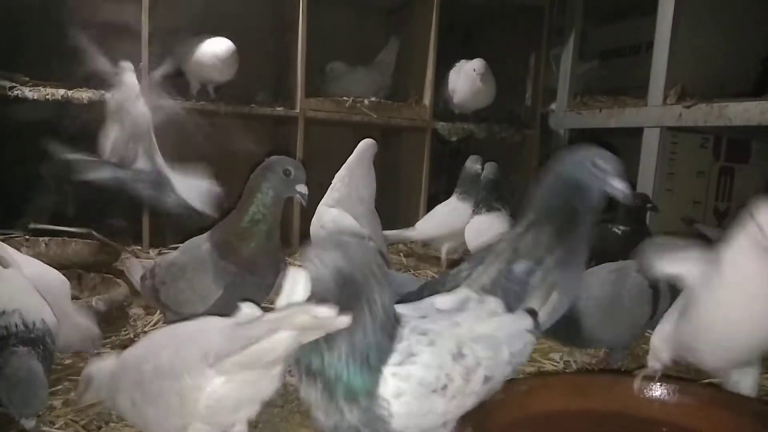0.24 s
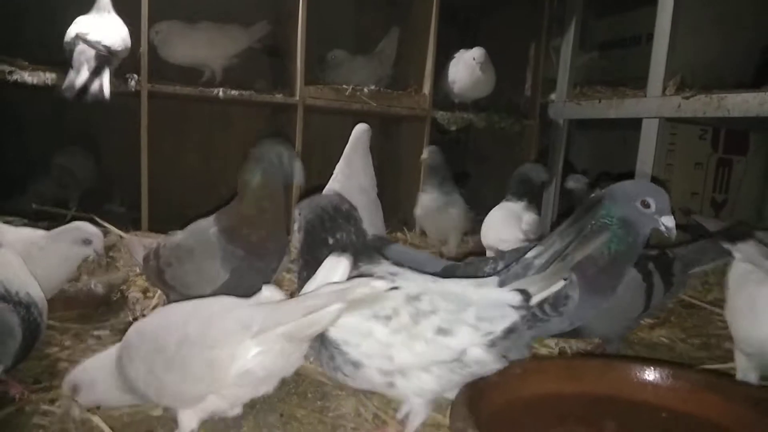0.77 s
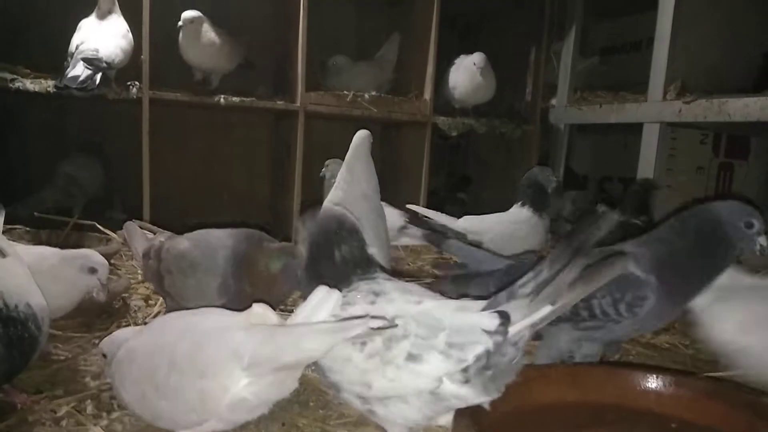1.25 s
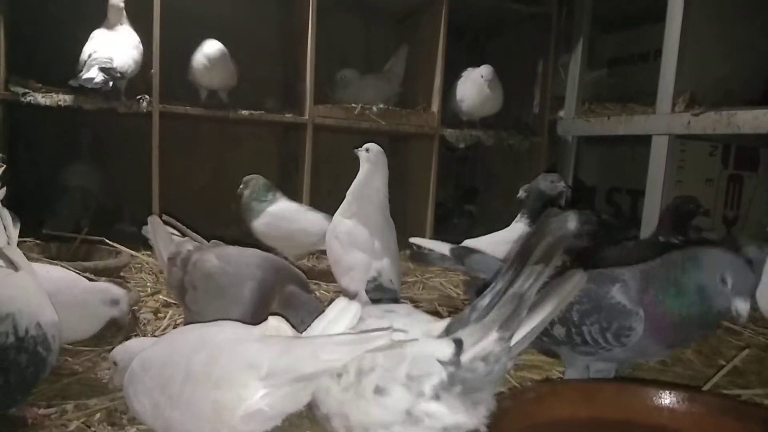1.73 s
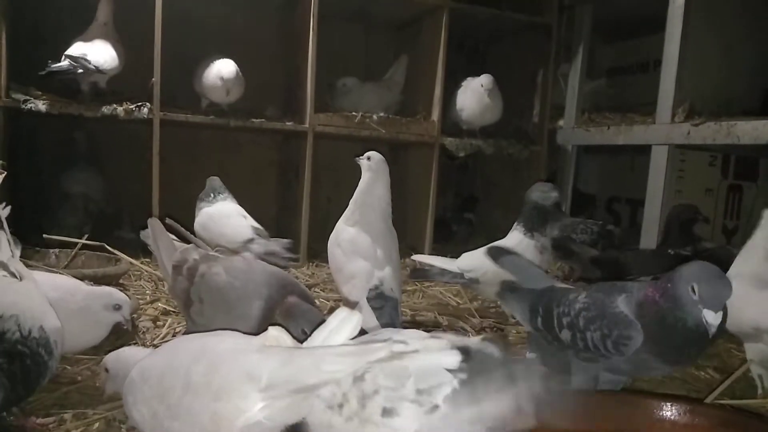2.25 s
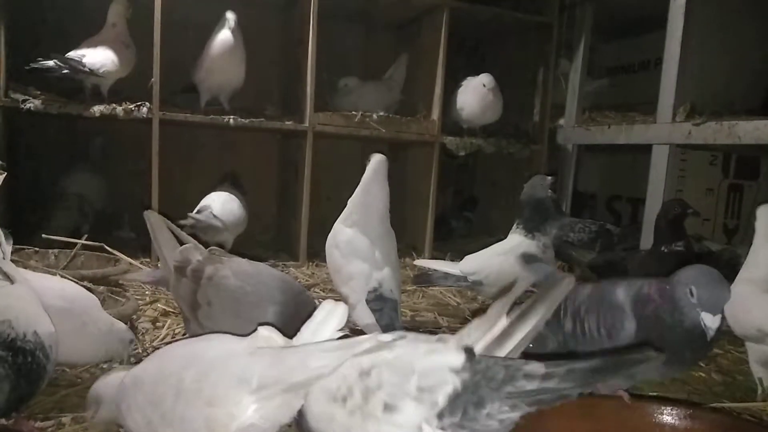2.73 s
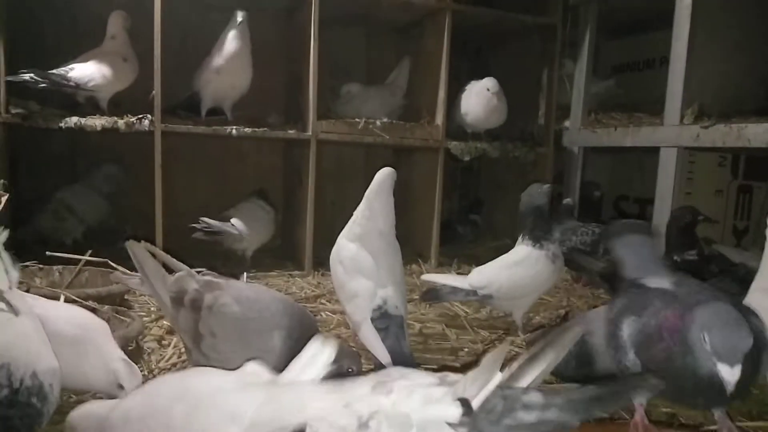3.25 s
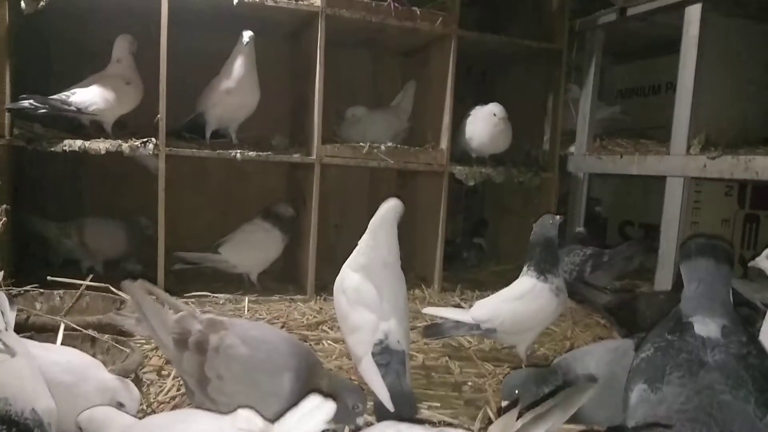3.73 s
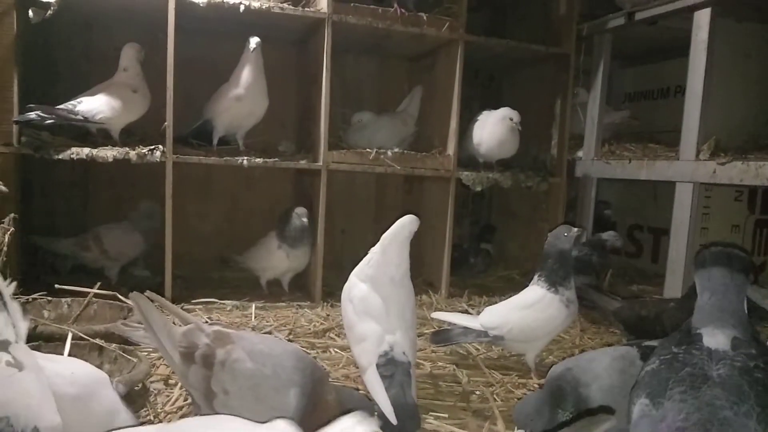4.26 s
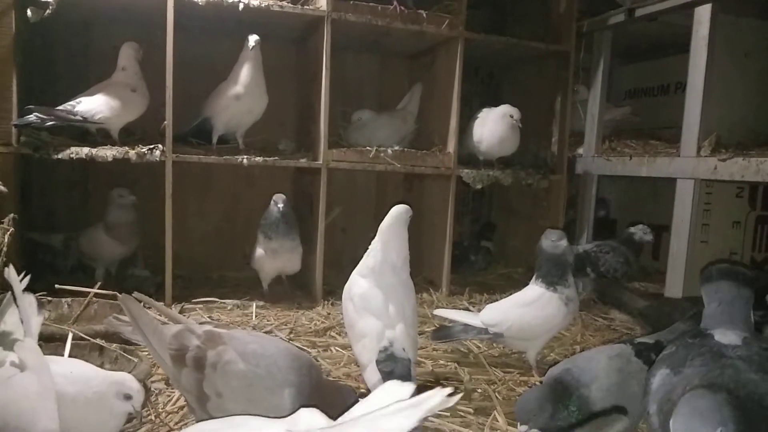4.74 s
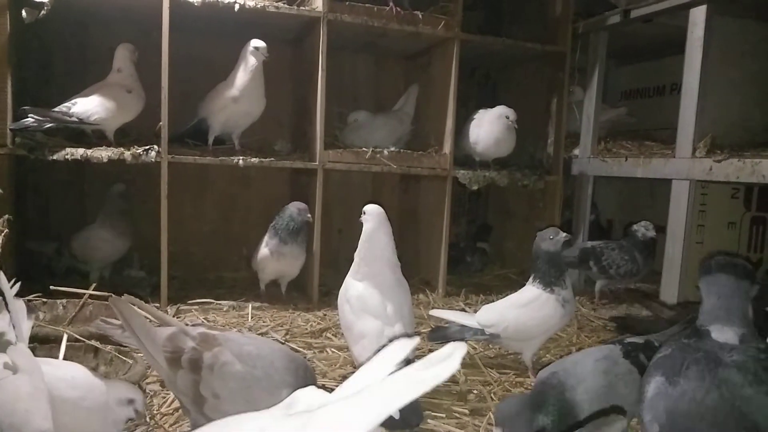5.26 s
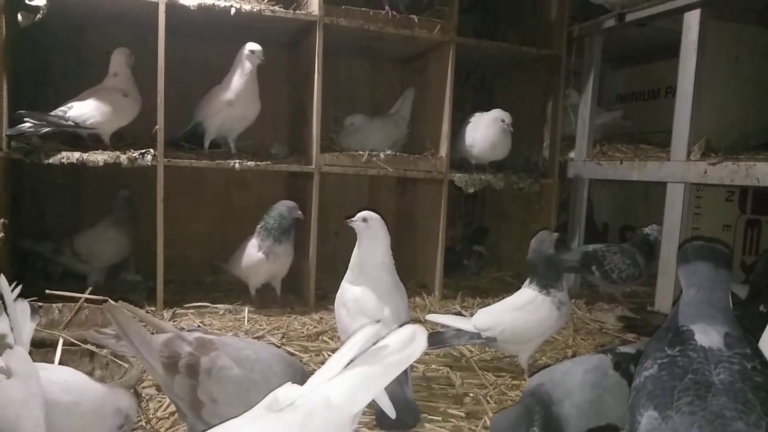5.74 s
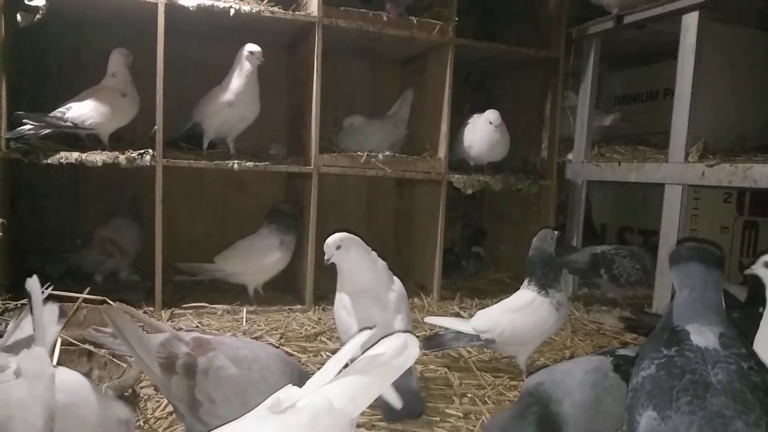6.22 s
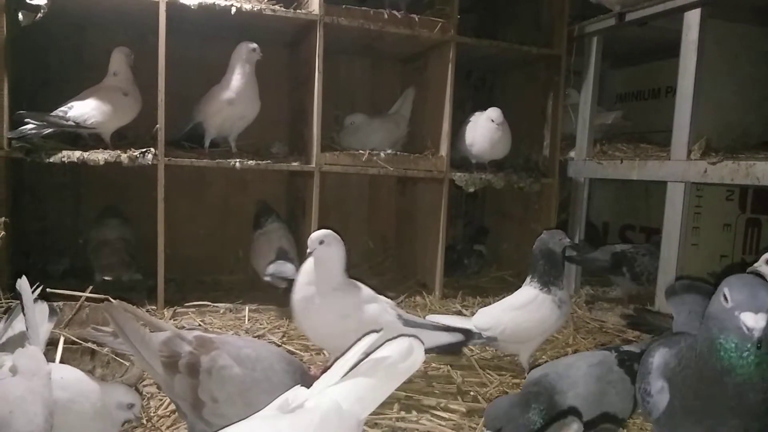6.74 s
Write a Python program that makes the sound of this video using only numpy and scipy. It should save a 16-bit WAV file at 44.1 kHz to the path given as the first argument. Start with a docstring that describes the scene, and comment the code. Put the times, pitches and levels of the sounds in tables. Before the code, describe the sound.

Many pigeons coo and bubble in overlapping bouts in a wooden loft, with wing flaps, dry straw snaps and small knocks.

```python
"""Crowded pigeon loft, 7 s, stereo; the right microphone is half covered and hears little treble.
0-3 s: thuds, knocks, a gust of wings, sharp snaps in dry straw; clear gliding coos (bent tones) from 0.9 s
and bubbling notes (tone blips), densest at 1.4-2.1 s. 3-4.6 s: more coos, wings again, a rolling coo (throbs
ringing a throat) at 4.0 s. 4.6-6.2 s: the farther birds (crowded blips) die away, stalks (noise bursts) still
snap. From 6.3 s: faint calls, notes, a short roll at 6.8 s; noise rustle and low hum lie under it all."""
import sys
import numpy as np
from scipy import signal
from scipy.fft import rfft, irfft, next_fast_len
from scipy.io import wavfile
from scipy.ndimage import uniform_filter1d, map_coordinates

SR = 44100
rng = np.random.default_rng(int(sys.argv[2]) if len(sys.argv) > 2 else 0)


def pcm_store(signal):
    """Save signal as 16-bit PCM."""
    levels = np.round(np.clip(np.atleast_2d(signal), -1, 1) * 32767)
    wavfile.write(sys.argv[1], SR, levels.astype(np.int16).T)


N = 308259
T = np.arange(N) / SR

# stirring of the straw: t/s, nominal level/dB
STIRRING = [(0.0, -53.5), (0.15, -47.5), (0.35, -43), (0.72, -51.5), (1.1, -48), (1.25, -47), (1.29, -50.5),
            (1.36, -41.5), (1.85, -52), (2.12, -57), (2.28, -50), (2.42, -48.5), (2.7, -54.5),
            (3.58, -53.5), (3.77, -58.5), (4.68, -54.5), (4.92, -57.5), (6.23, -62), (6.41, -58),
            (6.99, -60.5)]
# colour of the rustle: t/s, treble fizz relative to it/dB, share of brighter stalks/0-1
COLOUR = [(0, -8, 0.9), (.5, -14.5, 0.57), (1.3, -5, 0.76), (1.9, -1, 0.86), (2.1, -6.5, 0.97),
          (3.6, -11.5, 0.45), (4.2, -9.5, 0.24), (6.99, -33, 0)]


def amp(db):
    """dB to amplitude factor."""
    return 10 ** (np.asarray(db) / 20)


def unit(x):
    """Scale to rms 1."""
    return x / np.sqrt(np.mean(x ** 2) + 1e-20)


def along(points, hz):
    """Interpolate (Hz, value) points on a log frequency axis."""
    f, v = np.transpose(points)
    return np.interp(np.log(hz + 1), np.log(f + 1), v)


def curves(rows, t=T):
    """One value per sample for each column after the time."""
    s, *cols = np.transpose(rows)
    return [np.interp(t, s, c) for c in cols]


def wobble(rate):
    """Smooth random curve, rate knots per s."""
    return map_coordinates(rng.standard_normal(int(N * rate / SR) + 4), [T * rate])


def filtered(x, response):
    """Multiply the spectrum of x by a complex response of frequency."""
    m = next_fast_len(N + SR // 2)
    return irfft(rfft(x, m) * response(np.fft.rfftfreq(m, 1 / SR)), m)[..., :N]


def mode(f, hz, width_hz):
    """Causal resonance of peak gain 1."""
    return 1j * f * width_hz / (hz * hz - f * f + 1j * f * width_hz)


def add(out, s, piece):
    """Mix a piece in at s seconds."""
    part = out[..., round(s * SR):][..., :piece.shape[-1]]
    part += piece[..., :part.shape[-1]]


def fade(t, edge_s):
    """Linear start and end."""
    return np.clip(np.minimum(t - t[0], t[-1] - t) / edge_s, 0, 1)


def call(start_s, length_s):
    """The samples of an event and its progress from 0 to 1."""
    span = slice(round(start_s * SR), min(N, round((start_s + length_s) * SR)))
    return span, np.clip((T[span] - start_s) / length_s, 0, 1)


def blip(hz, length_s, bend):
    """Short tone with a quick start, whose pitch bends by a share of itself."""
    length_s = max(length_s, .005)
    u = np.arange(int(length_s * SR)) / (length_s * SR)
    return np.sin(np.pi * u ** .5) ** 2 * np.sin(2 * np.pi * np.cumsum(hz * (1 + bend * (u - .5))) / SR)


def coos():
    """Closed-beak calls: almost pure tones that glide, dip and swell, slightly unsteady."""
    # one tone a row; the 805 Hz row is the third harmonic of the 270 Hz coo, not a call of its own:
    # t/s, length/s, first pitch/Hz, glide to the end/Hz, dip in the middle/Hz, level before arch/dB,
    # swell start to end/dB
    coo_tones = [(0.909, 0.04, 412.5, -135, 5, -33, 12), (0.945, 0.11, 269.7, 3, 12, -34, -3),
                 (0.945, 0.09, 805, -13, 24, -47, 0), (0.984, 0.1, 436, 9.5, -5, -36.5, -1),
                 (1.081, 0.055, 463, -48, -0.5, -33.5, -1), (1.148, 0.3, 467.5, -73.5, 1.5, -54.5, -18),
                 (1.176, 0.16, 207, 45, -18.5, -45.5, -7), (1.985, 0.12, 298, 6.5, 7.5, -29, -1),
                 (1.96, 0.12, 419.6, 57, 4.5, -37.5, -4), (2.12, 0.45, 232, -42, 2.5, -49, -13),
                 (2.165, .197, 435.5, 6, 12.5, -30, 3.5), (2.245, 0.25, 320.6, 20, 22.5, -44.5, -3),
                 (2.369, 0.12, 433.5, -11, -5, -32.5, -8), (2.992, 0.055, 765, 0, -2, -50, 2),
                 (3.3, 0.158, 157.5, 48, 2, -50.5, -2), (3.392, 0.22, 496.5, -16.5, 42.5, -46.5, 16),
                 (3.583, 0.12, 455, 2, 121.5, -28.5, 3.5), (3.917, 0.115, 397.6, 2, -16, -39, -1),
                 (4.24, 0.35, 420.7, 26, -9, -41, -3), (6.3, 0.22, 177.6, 15.5, 7.5, -48, 8),
                 (6.425, 0.091, 353, -4, 8, -46, -6), (6.62, 0.064, 180, -17.5, -0.5, -47.5, 17)]
    arch_db, flutter_db, pitch_drift = 1.8, 0.9, 0.008  # louder middle; scatter of level and pitch (share)
    out, drift = np.zeros(N), wobble(60)
    flutter = wobble(58) + 0.6 * wobble(140)
    phases = rng.random(len(coo_tones))
    for (start, length, hz, glide_hz, dip_hz, db, swell_db), phase in zip(coo_tones, phases):
        span, u = call(start, length)
        arch = np.sin(np.pi * u)
        pitch_hz = (hz + glide_hz * u - dip_hz * abs(arch) ** 0.925) * (1 + pitch_drift * drift[span])
        level_db = db + swell_db * (u - .5) + arch_db * arch + flutter_db * flutter[span]
        tone = np.sin(2 * np.pi * (np.cumsum(pitch_hz) / SR + phase))
        out[span] += fade(T[span], 0.0029) * amp(level_db) * tone
    return out


def rolls():
    """Regular throbs of air: each swells a tone that slides upward and rings the throat."""
    # rolling coos: t/s, length/s, throbs/(1/s), rasp over the tone/ratio
    rolling_coos = [(4.023, .572, 44.7, 0.5), (6.803, .2, 38.5, 0.9)]
    # inflated throat: f/Hz, width/Hz, level/dB
    throat_modes = [(240, 70, -10), (310, 91, -1.5), (487, 17, -8.5), (533, 25, -2.5), (641, 72, -10.5)]
    # t/s, level/dB
    effort = [(4.02, -41.5), (4.08, -37), (4.16, -38), (4.21, -40), (4.29, -35), (4.39, -34.5),
              (4.48, -38.5), (4.505, -45), (4.53, -32), (4.595, -49), (6.8, -53), (6.87, -37), (7, -43)]
    edge_s = 0.0075

    def throat(f):
        # alternating signs
        modes = sum((-1) ** k * amp(db) * mode(f, hz, w) for k, (hz, w, db) in enumerate(throat_modes))
        return modes * mode(f, 363, 540) ** 2

    cycle = .04 * wobble(30)  # throbs so far; each roll ends on a whole one
    for start, length, per_s, _ in rolling_coos:
        rest = (T > start + length) * (per_s * length % 1)
        cycle = cycle + per_s * np.clip(T - start, 0, length) - rest
    size = amp(0.8 * wobble(50))
    onsets = np.clip(np.diff(np.floor(np.maximum.accumulate(cycle) - .25), prepend=0), 0, 1)
    puffs = onsets * size * amp(0.92 * wobble(50))
    ring = unit(filtered(puffs + .01 * rng.standard_normal(N), throat))
    swell = 0.2 + np.sin(np.pi * cycle) ** 2
    pitch_hz = 315 * (1 + 0.38 * (cycle % 1 - .5) + 0.02507 * wobble(12))
    slide = unit(size * swell * np.sin(2 * np.pi * np.cumsum(pitch_hz) / SR))
    effort_db, = curves(effort)
    out = np.zeros(N)
    for start, length, _, rasp in rolling_coos:
        span, _ = call(start, length)
        voice = unit((rasp * ring + slide)[span])
        out[span] += fade(T[span], edge_s) * amp(effort_db[span]) * voice
    return out


def notes():
    """Bubbling syllables of near birds, as bent blips; the high ones are hoarse (fast level scatter)."""
    # t/s, nominal level/dB, f/Hz, length/s
    short_notes = [(0.288, -29.5, 450, 0.021), (0.672, -28.5, 300, 0.027), (0.75, -32, 266, 0.035),
                   (1.399, -24.5, 320, 0.012), (1.484, -33.5, 392, 0.04), (1.61, -33, 414, 0.028),
                   (1.73, -20.5, 349, 0.024), (1.766, -27, 421, 0.054), (1.802, -30, 305, 0.028),
                   (1.835, -31.5, 416, 0.042), (1.894, -29, 379, 0.053), (1.928, -35, 393, 0.022),
                   (1.961, -31, 431, 0.092), (2.089, -25.5, 422, 0.037), (2.142, -28, 385, 0.045),
                   (2.954, -33, 259, 0.011), (2.966, -31, 320, 0.024), (3.148, -30.5, 237, 0.016),
                   (3.154, -33, 434, 0.019), (3.699, -23, 304, 0.019), (3.85, -33, 302, 0.027),
                   (3.885, -31.5, 362, 0.022), (6.348, -42, 452, 0.018), (6.482, -39.5, 420, 0.033),
                   (6.666, -41.5, 471, 0.047), (6.769, -30, 435, 0.015), (0.547, -38, 824, 0.021),
                   (0.919, -39, 715, 0.043), (1.039, -33, 685, 0.022), (1.104, -35.5, 770, 0.043),
                   (1.475, -35, 780, 0.02), (1.487, -41.5, 950, 0.041), (1.558, -43, 808, 0.054),
                   (1.666, -43.5, 643, 0.1), (2.169, -42.5, 668, 0.065), (2.273, -37, 717, 0.03),
                   (2.39, -37, 790, 0.029), (2.984, -27.5, 807, 0.019), (6.544, -30, 757, 0.032)]
    out, hoarse = np.zeros((2, N)), amp(2.5 * wobble(480))
    for (s, db, hz, length), bend in zip(short_notes, rng.standard_normal(len(short_notes))):
        high = int(hz > 600)
        add(out[high], s - .004, amp(db - 2.5 - 1.9 * high) * blip(hz, length, 0.078 * bend))
    return out[0] + hoarse * out[1]


def snaps():
    """Gritty noise bursts, from a short crack to a longer stroke, each with a duller knock under it."""
    # stalks, claws, feather strokes: t/s, nominal level/dB, knock relative to it/dB, length/s
    breaks = [(0.137, -28.5, -8, 0.093), (0.2024, -25, -7.5, 0.14), (0.235, -20.5, -7.5, 0.045),
              (0.291, -31.5, -0.5, 0.059), (0.308, -26.5, -1.5, 0.028), (0.355, -23, -10, 0.074),
              (0.408, -8.5, -11.5, 0.025), (0.518, -21.5, -12.5, 0.048), (0.538, -28.5, -5, 0.045),
              (0.586, -40.5, 5, 0.017), (0.674, -23.5, -29, 0.028), (0.923, -29.5, -9, 0.11),
              (0.948, -27.5, -18, 0.02), (1.03, -41, 1, 0.037), (1.099, -39.5, 2, 0.012),
              (1.129, -26, -7, 0.1), (1.149, -21, -14, 0.041), (1.197, -24, -22, 0.013),
              (1.222, -24.5, -12, 0.024), (1.2514, -21.5, -12.5, 0.042), (1.3892, -14.5, -31, 0.01),
              (1.391, -22, -10.5, 0.2), (1.611, -26, -16, 0.1), (1.824, -32.5, -11, 0.36),
              (1.933, -29, -15.5, 0.19), (2.002, -27.5, -18, 0.021), (2.743, -36.5, -13, 0.16),
              (2.796, -28.5, -9.5, 0.042), (2.974, -35, -9, 0.021), (3.2454, -36, 0, 0.008),
              (3.2535, -22, -16, 0.011), (3.2636, -23.5, -19, 0.018), (3.324, -36, -6.5, 0.05),
              (3.391, -31, -17, 0.017), (3.448, -31.5, -6, 0.029), (3.608, -31.5, -22, 0.33),
              (4.034, -32.5, -37, 0.025), (4.156, -31, -10.5, 0.06), (4.222, -34, -9.5, 0.19),
              (4.41, -41, -6, 0.06), (4.496, -41, -16, 0.02), (4.574, -32.5, -3.5, 0.05),
              (4.6167, -19.5, -38, 0.019), (4.652, -27.5, -12.5, 0.057), (4.738, -34, -18, 0.066),
              (4.991, -40, -9, 0.054), (5.057, -34.5, -14, 0.023), (5.204, -40, -26, 0.017),
              (5.2298, -33, -20, 0.0089), (5.233, -33, -19, 0.079), (5.383, -34.5, -20, 0.016),
              (5.422, -29, -19.5, 0.044), (5.571, -35.5, -25, 0.033), (5.588, -39.5, -13, 0.25),
              (5.733, -41, -20, 0.015), (5.8399, -27, -7, 0.0074), (5.933, -39.5, -8, 0.015),
              (6.311, -25, -12, 0.032), (6.719, -36.5, -12, 0.024), (6.755, -33.5, -10, 0.049)]
    crack_t60_s, crack_gain, crisp_s = 0.003, 2.2, 0.045  # strokes longer than crisp_s start softly
    bright, dull, t = np.zeros((2, N)), np.zeros((2, N)), np.arange(SR // 4) / SR
    for s, db, knock_db, length in breaks:
        length = max(length, .01)
        first = 0.85 * amp(-60 * t / (.5 * length))
        stroke = 0.68 * amp(-40 * (t / length) ** 2)  # holds, then stops
        settling = 0.23 * amp(-60 * t / 0.17)
        shape = (first + stroke + settling) * (1 - np.exp(-t / (0.041 * length)))
        crack = crack_gain * np.exp(-(length / crisp_s) ** 2) * amp(-60 * t / crack_t60_s)
        steps = np.repeat(rng.uniform(-2.25, 1, len(t) // 64 + 1), 64)[:len(t)]
        grit = amp(3.6 * steps + 3)
        burst = rng.standard_normal((2, len(t))) * (shape * grit + crack)
        add(bright, s, amp(db + 2.0) * burst)
        add(dull, s, amp(db + knock_db + 5.0) * burst[::-1])  # channels swapped
    fizz_db, share = curves(COLOUR)
    share = np.clip(share, 0, 1)
    fizz = amp(fizz_db - 6.5) * filtered(bright, lambda f: mode(f, 11500, 6000) ** 2)
    brighter = filtered(share * bright, lambda f: mode(f, 6930, 2150) ** 2)
    darker = filtered((1 - share) * bright, lambda f: mode(f, 5980, 2600) ** 2)
    return brighter + darker + fizz + filtered(dull, lambda f: mode(f, 3120, 2820) ** 2)


def ticks():
    """Small stalks break at random as brief noise decays, louder where the straw is stirred."""
    per_s, over_stirring_db, t60_s, spread_db = 170, 10, 0.0034, 2
    sizes = amp(spread_db * np.minimum(rng.exponential(size=N), 3))
    starts = (rng.random(N) < per_s / SR) * sizes
    dying = signal.lfilter([1], [1, -amp(-60 / (t60_s * SR))], starts)
    grains = filtered(dying * rng.standard_normal((2, N)), lambda f: mode(f, 4800, 4100) ** 2)
    return amp(curves(STIRRING)[0] + over_stirring_db) * grains


def thuds():
    """Wing beats and landings: a few low cycles."""
    # t/s, nominal level/dB, boom/Hz
    booms = [(0.225, -27.5, 183), (0.406, -30, 166), (0.511, -37, 176), (2.954, -37, 185),
             (3.481, -41.5, 166), (3.706, -39, 126), (3.946, -35, 107), (6.427, -38, 162)]
    out = np.zeros(N)
    for s, db, hz in booms:
        add(out, s - .006, amp(db - 1.0) * blip(hz, 7.6 / hz, 0.26))
    return out


def knocks():
    """Dull blows: a short burst rings the thin boards and, longer, the floor below."""
    # feet and beaks on wood: t/s, nominal level/dB, low part relative to it/dB
    blows = [(0.208, -42, 0), (0.244, -35.5, -4.5), (0.288, -34.5, -0.5), (0.411, -19, -24.5),
             (0.524, -34, -9.5), (0.675, -47.5, 8.5), (2.1, -54, 10), (2.688, -32, -23), (2.979, -36.5, -4),
             (3.1, -38, -38), (3.953, -49, 3), (4.26, -36, -25), (5.84, -42, -28), (6.258, -44, -10),
             (6.419, -41, -0.5)]
    thin, floor, t = np.zeros(N), np.zeros(N), np.arange(SR // 8) / SR
    t60_s = np.array([[.05], [.11]])
    for s, db, low_db in blows:
        burst = rng.standard_normal((2, len(t))) * amp(-60 * t / t60_s) * (1 - np.exp(-t / 0.0024))
        add(thin, s, amp(db + 7.5) * burst[0])
        add(floor, s, amp(db + low_db + 26.5) * burst[1])
    boards = filtered(thin, lambda f: mode(f, 630, 3100) ** 2)
    return boards + filtered(floor, lambda f: mode(f, 346, 340) ** 2)


def taps():
    """Claws on the drinking dish: each contact rings its modes briefly."""
    # t/s, level/dB
    contacts = [(0.536, -40), (0.948, -37), (1.408, -44), (4.579, -42.5)]
    # f/Hz, level/dB, t60/s
    dish_modes = [(2080, -3, 0.046), (2680, 13, 0.02), (3970, -3, .03), (6350, 13, 0.025)]
    scatter_db = 3 * rng.standard_normal((len(contacts), len(dish_modes)))
    out, t = np.zeros(N), np.arange(SR // 10) / SR
    for (s, db), offsets_db in zip(contacts, scatter_db):
        ring = sum(amp(level + offset_db - 60 * t / t60) * np.sin(2 * np.pi * hz * t)
                   for (hz, level, t60), offset_db in zip(dish_modes, offsets_db))
        add(out, s, amp(db) * ring * (1 - np.exp(-t / 0.00059)))
    return out


def wings():
    """Beating wings blow turbulent air at both microphones, with a soft swish above."""
    # t/s, length/s, level at the start/dB
    beats = [(0.196, 0.32, -37.5), (3.598, 0.26, -40.5)]
    edge_s, fade_db = 0.041, 8.5
    air = rng.standard_normal((2, N)) + 1.4 * rng.standard_normal(N)  # partly common to both sides
    gust = unit(filtered(air, lambda f: mode(f, 94, 109) ** 2 + 0.11 * mode(f, 720, 3000) ** 2))
    out = np.zeros((2, N))
    for start, length, db in beats:
        span, u = call(start, length)
        out[:, span] = fade(T[span], edge_s) * amp(db - fade_db * u) * gust[:, span]
    return out


def flock():
    """Many farther birds overlap in short syllables at scattered pitches and places."""
    # t/s, level of the low voices/dB
    murmur = [(0, -62), (.3, -45), (1.15, -40.5), (1.9, -46), (2.4, -41.5), (2.55, -59.5), (3.55, -52.5),
              (3.75, -43), (3.82, -47), (3.9, -43.5), (4.5, -45), (4.65, -66), (6.2, -78), (6.3, -53),
              (6.74, -53.5), (7, -40)]
    # what carries of the farther voices: f/Hz, width/Hz, level/dB
    far_throat = [(206, 70, -2.5), (431.7, 54, -4.5), (694, 520, 2.5)]
    low_db, = curves(murmur)
    high_db = -60 + 0.25 * (low_db + 40.5)  # follows a quarter of the low voices' swings
    out = np.zeros((2, N))
    for db, low_hz, high_hz in ((low_db, 150, 500), (high_db, 540, 900)):
        crowd = np.zeros((2, N))
        for when, pitch, life, size, side in rng.random((1900, 5)):
            hz = low_hz + pitch * (high_hz - low_hz)
            voice = amp(7.0 * size) * blip(hz, 0.015 + 0.048 * life ** 2, 0.26 * (side - .5))
            add(crowd, when * T[-1], voice * amp([[3 * (side - .5)], [-3 * (side - .5)]]))
        crowd = filtered(crowd, lambda f: sum(amp(level) * mode(f, hz, w) for hz, w, level in far_throat))
        out += amp(db + 1.2 * wobble(20)) * unit(crowd)
    return out


def rush(spectrum, crackle=0, patchy_db=0, per_s=500, spread_db=3):
    """Stereo noise of rms 1, with patches of colour and short crackles."""
    # f/Hz, left-right likeness/correlation
    likeness = [(60, 0.88), (240, 0.81), (950, 0.012), (3770, 0.035), (15000, 0.19)]
    z = signal.stft(rng.standard_normal((2, N)), nperseg=512)[2]
    field = uniform_filter1d(uniform_filter1d(rng.standard_normal(z.shape[1:]), 8, 0), 6, 1)
    pair = signal.istft(z * amp(patchy_db * unit(field)), nperseg=512)[1][:, :N]
    sparks = (rng.random(N) < per_s / SR) * amp(spread_db * rng.exponential(size=N))
    pair = pair * (1 + crackle * signal.lfilter([1], [1, -np.exp(-1 / (0.0063 * SR))], sparks))

    def mid_side(hz):
        turn = np.arccos(np.clip(along(likeness, hz), -1, 1)) / 2
        return amp(along(spectrum, hz)) * [np.cos(turn), np.sin(turn)]

    mid, side = filtered(pair, mid_side)
    return unit(np.array([mid + side, mid - side]))


def straw():
    """Feet and feathers stir the stalks in quick gusts over a steady far hiss; the building hums below."""
    # noise spectra: f/Hz, relative density/dB per Hz
    brighter = [(3000, -59), (3900, -15), (4800, -10.5), (5600, -5), (7200, 0.5), (8300, -4), (9600, -34)]
    darker = [(1760, -14), (3000, -7), (3420, -30), (4310, -8.5), (5480, -1.5), (7150, -3.5), (9500, -24),
              (12400, -50)]
    shuffle = [(600, -44), (1000, -1.5), (1400, -6), (2100, -1.5), (2700, 4), (3400, 4.5), (4200, -3),
               (5500, -8)]
    treble = [(7000, -10.5), (9000, -1), (10300, -1.5), (13000, 0), (15600, 2)]
    hum = [(18, -50), (30, -22), (108, 1.5), (282, -14.5), (423, -14), (509, -25.5), (613, -8.5),
           (710, -23.5), (1330, -22), (2500, -25), (3250, -56), (5500, -120)]
    # brief swells of the shuffle: t/s, 1/e half-width/s, rise/dB
    strokes = [(0.0, 0.027, 9.5), (2.388, 0.032, 9), (4.22, 0.037, 5)]
    gust_db = 1.5 * wobble(18) + 1.38 * wobble(55)
    (stir_db,), (fizz_db, share) = curves(STIRRING), curves(COLOUR)
    share = np.clip(share, 0, 1)
    swells_db = sum(db * np.exp(-((T - s) / width) ** 2) for s, width, db in strokes)
    stalks = share * rush(brighter, crackle=0.34, patchy_db=0.0)
    stalks = stalks + (1 - share) * rush(darker, crackle=0.96, patchy_db=0.5)
    rustle_db = stir_db + gust_db + 6
    shuffle_db = -54.5 + (stir_db + 55.5) + swells_db + 1.5 * gust_db
    body = amp(shuffle_db) * rush(shuffle, crackle=0.077, patchy_db=3.0)
    fizz = amp(rustle_db + fizz_db) * rush(treble, crackle=0.44, patchy_db=-1.0)
    far_hiss = amp(-73.5) * rush(brighter)
    return amp(rustle_db) * stalks + body + fizz + far_hiss + amp(-54.5) * rush(hum)


def loft(x, t60_s=0.22):
    """Wooden walls: a short decaying noise tail of its own at each microphone."""
    t = np.arange(SR // 3) / SR
    tail = rng.standard_normal((2, len(t))) * amp(-60 * t / t60_s) * (t > .004)
    return signal.fftconvolve(x[None], tail / np.linalg.norm(tail[0]), axes=1)[:, :N]


def scene():
    """Near sources with their wall tail, plus everything left dry."""
    near = coos() + rolls() + notes() + thuds() + knocks()
    return near + amp(-10.0) * loft(near) + taps() + flock() + wings() + straw() + snaps() + ticks()


def record(dry):
    """The covered right microphone loses treble and shifts phase; nothing is kept above the band limit."""
    # f/Hz, loss at the right microphone/dB
    cover_loss = [(60, 1), (300, -0.8), (700, -1), (1300, 1), (2400, 5.5), (4400, 6.5), (8000, 24.5),
                  (12000, 12), (15000, 20)]
    # f/Hz, phase by which the left microphone leads/rad
    left_lead = [(30, -0.052), (250, 0.0091), (780, 0.59), (2000, -1.35)]
    top_hz, dull_hz = 15700, 14900  # band limit; both microphones fade around dull_hz

    def microphones(hz):
        band = (hz < top_hz) / (1 + (hz / dull_hz) ** 8)
        right = amp(-along(cover_loss, hz)) * np.exp(-1j * along(left_lead, hz))
        return band * [np.ones_like(hz), right]

    return filtered(dry, microphones)


dry = scene()
out = record(dry)
pcm_store(out)
```